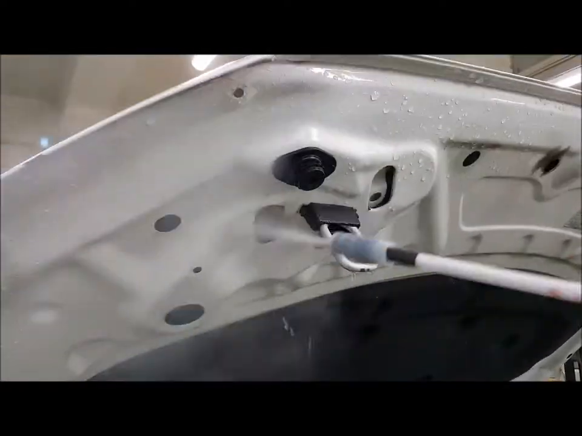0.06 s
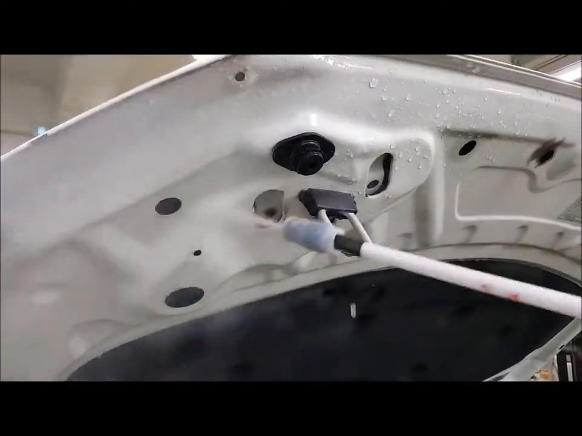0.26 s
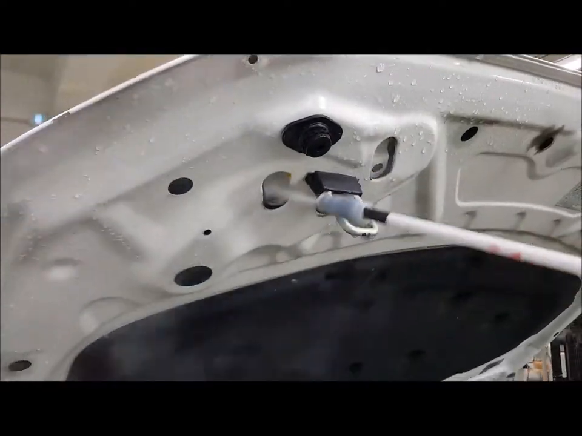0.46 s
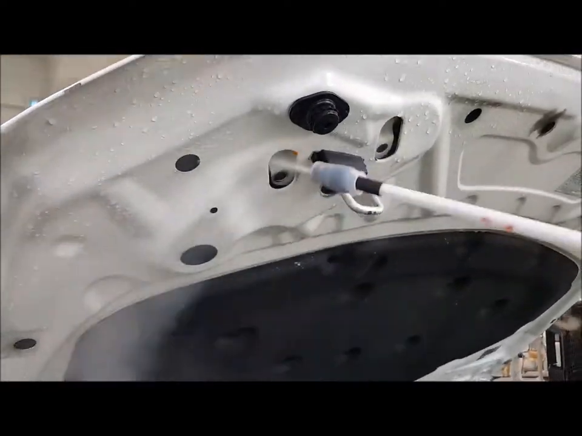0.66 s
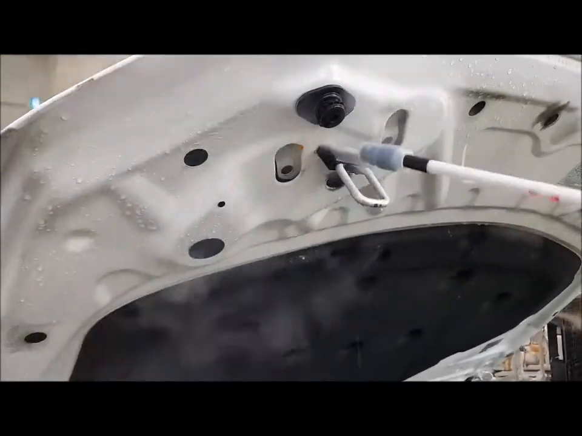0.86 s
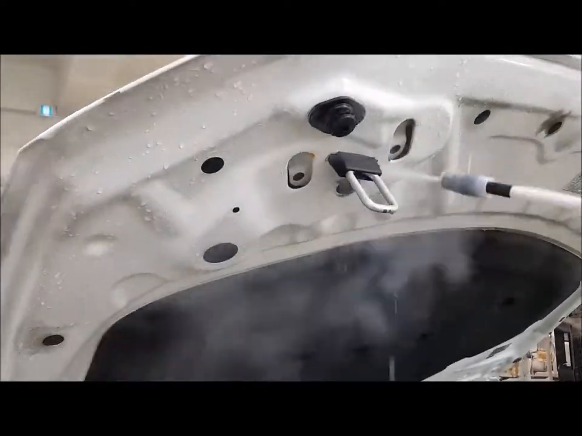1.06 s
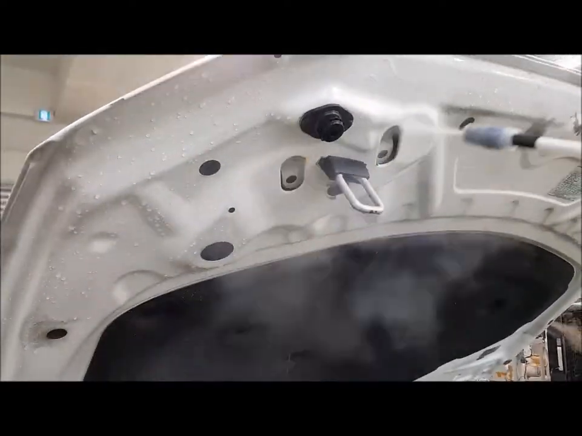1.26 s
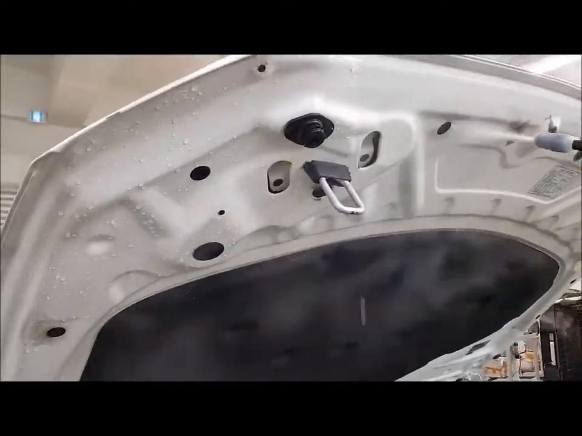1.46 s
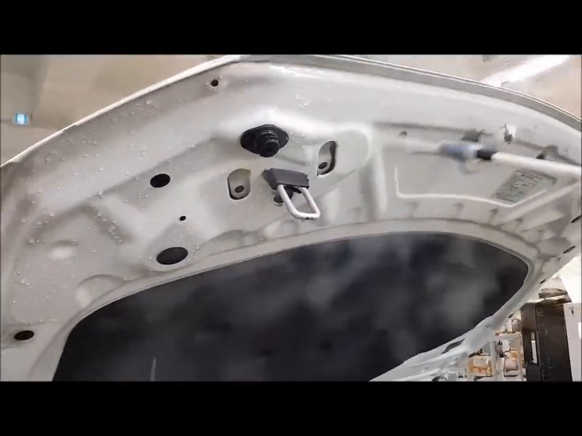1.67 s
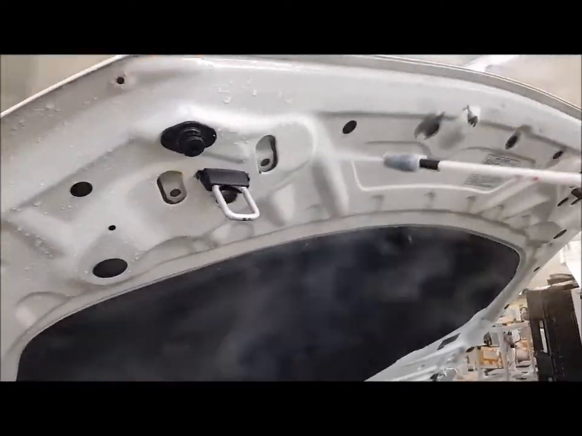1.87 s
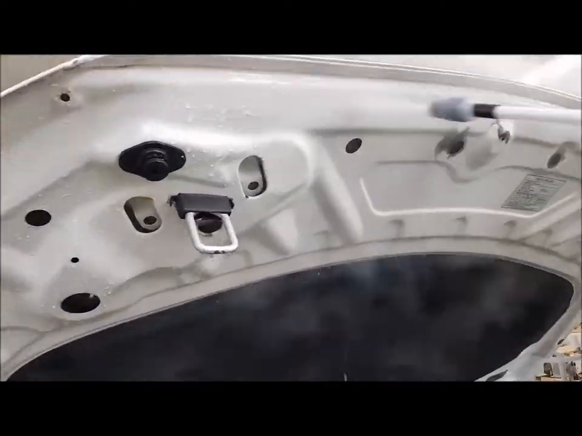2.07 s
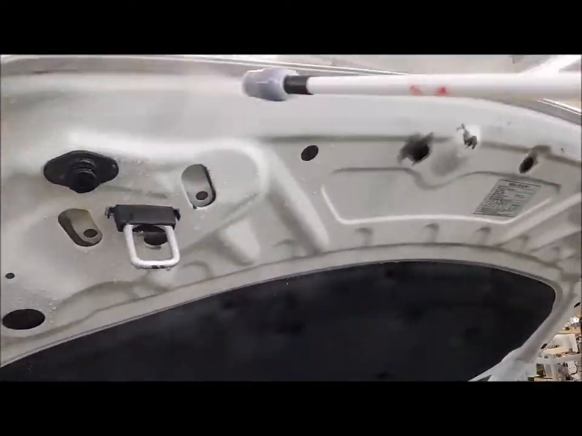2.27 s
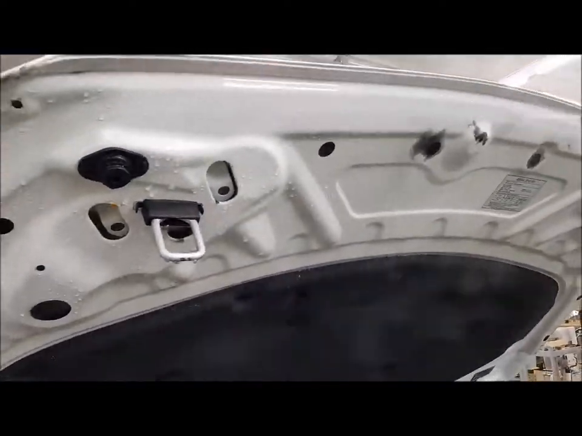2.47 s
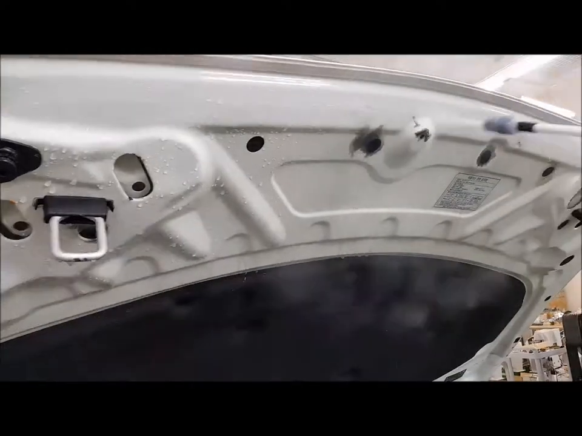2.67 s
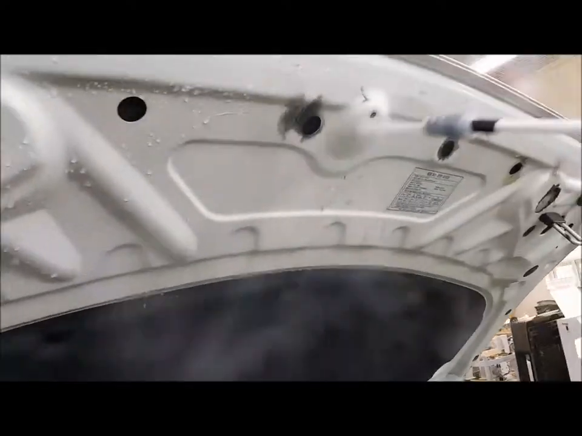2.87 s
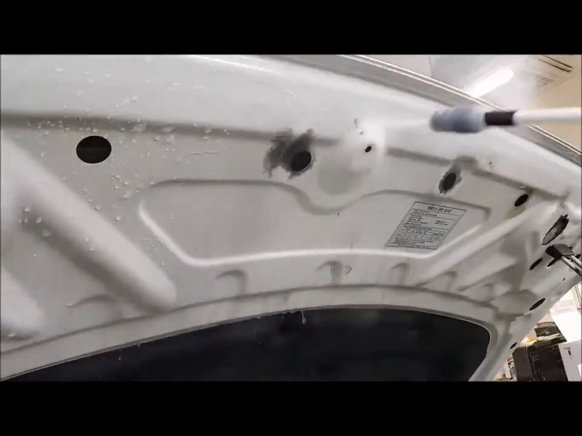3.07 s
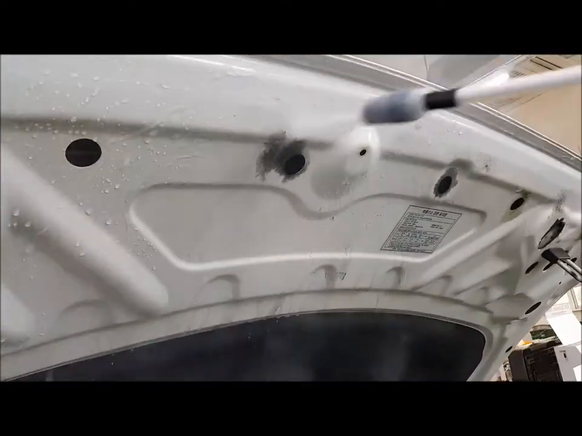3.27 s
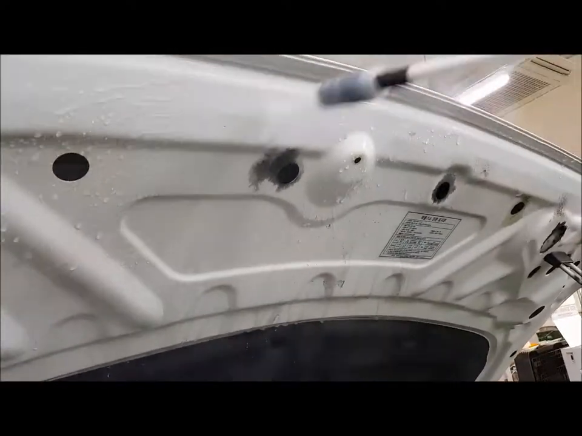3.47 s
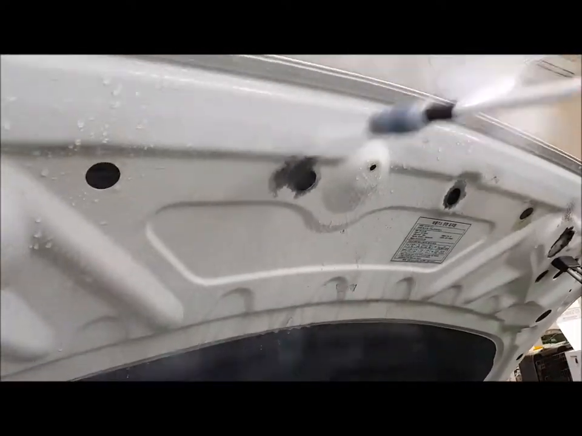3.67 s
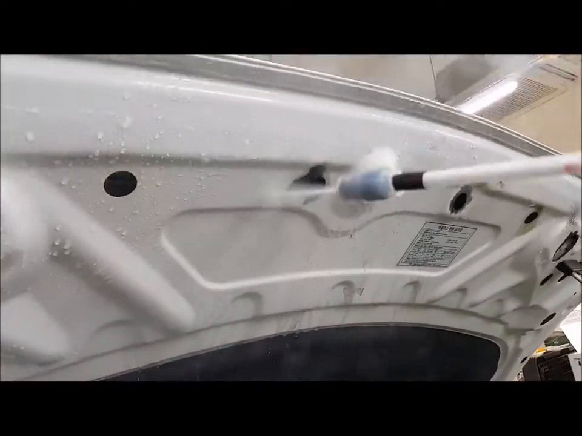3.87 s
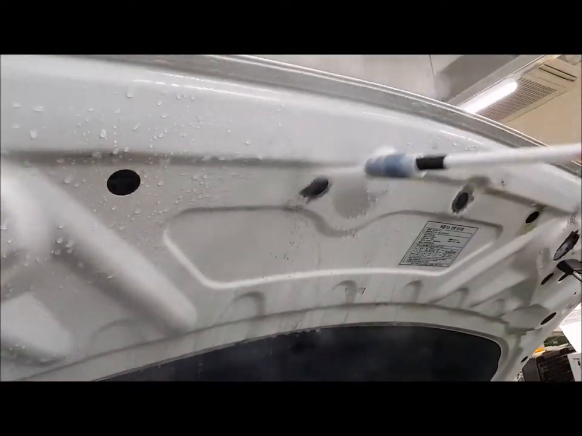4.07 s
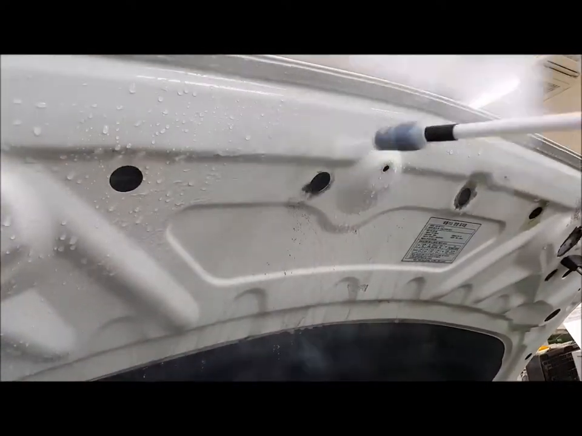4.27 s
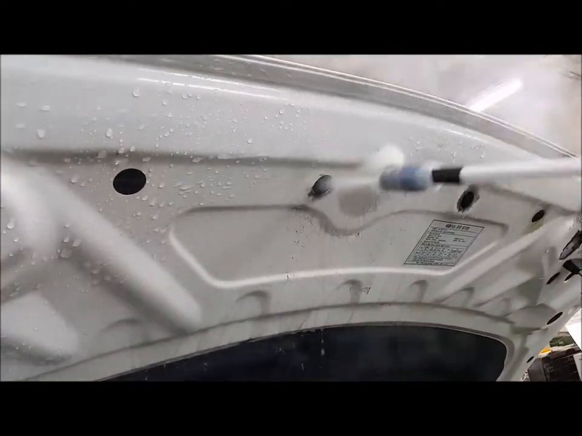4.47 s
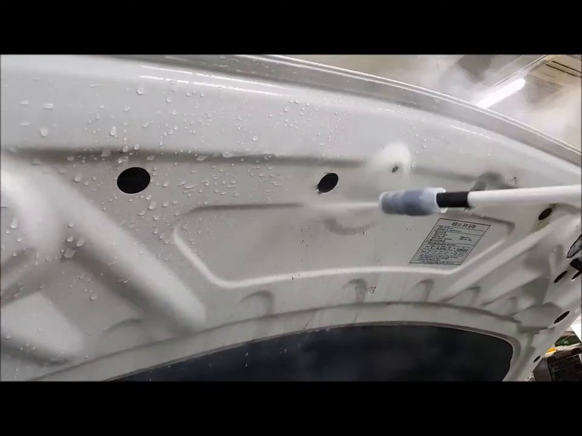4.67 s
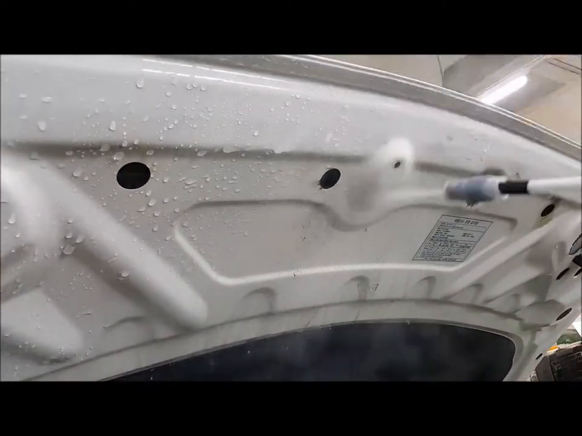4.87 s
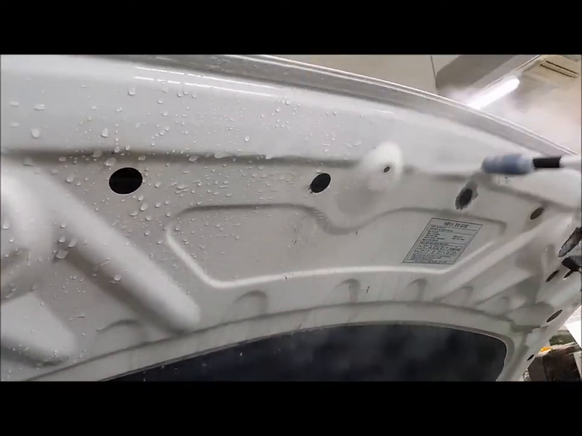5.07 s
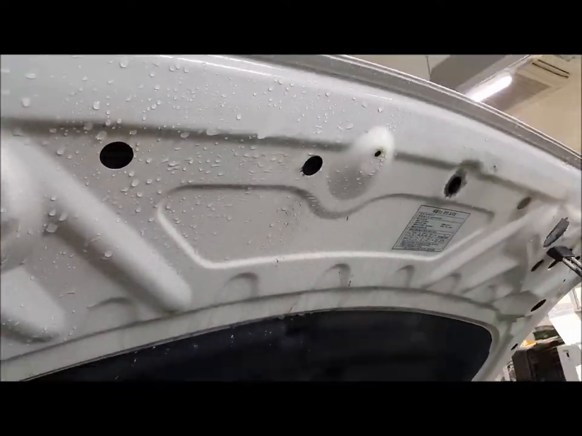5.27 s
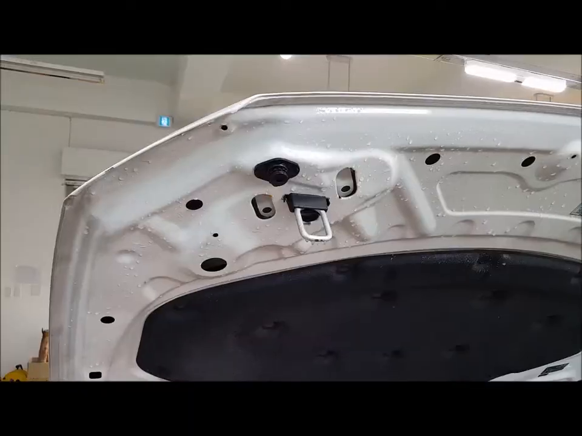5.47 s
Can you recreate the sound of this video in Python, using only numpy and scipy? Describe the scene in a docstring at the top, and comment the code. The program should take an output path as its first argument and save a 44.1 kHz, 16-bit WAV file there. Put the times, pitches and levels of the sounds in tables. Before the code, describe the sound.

A steam cleaner lance sprays the underside of a car bonnet close to the microphone, in a workshop with faint reverberation. From the start there is a loud, bright hiss with a softer roar on the sheet metal, and a sharp spurt of water at about 0.1 seconds. Hot water keeps spitting from the nozzle in fits of quick, evenly spaced bursts, some snapping, some splashy. A few faint, dull drips tick at around 0.8 seconds. The sputter is crisp and fast from 1.5 to 2.1 seconds, eases briefly, returns at 2.7, and comes in doubled bursts from about 3.9 to 4.7. The hiss shifts in colour as the jet sweeps over ribs and hollows. It thins at 5 seconds and dies away just after 5.2, leaving a quiet machine whine and rush of air. At about 5.5 seconds a low hum with rumble starts abruptly.

```python
"""Steam lance under a car bonnet

A steam jet is swept along the underside of a raised bonnet in a workshop, close to the microphone.
Its turbulence hisses and roars on the sheet metal; in fits, slugs of hot water plug the nozzle and burst
out at a steady beat, singly or in pairs. The panel resonates and reflects the hiss, and runoff drips.
When the trigger is let go the jet dies away and a machine's whine remains; at the very end the scene
cuts abruptly to a 220 Hz hum with rumble."""
import sys
import numpy as np
from scipy import signal
from scipy.fft import rfft, irfft
from scipy.io import wavfile
from scipy.ndimage import uniform_filter1d, map_coordinates

SR = 44100
rng = np.random.default_rng(int(sys.argv[2]) if len(sys.argv) > 2 else 0)


def put_to_file(sound):
    """Save the sound as 16-bit audio at rate SR, in the file named by the first command-line argument."""
    columns = np.atleast_2d(sound).T  # one column per channel
    safe = np.clip(columns, -1, 1)
    whole_steps = np.round(safe * 32767)
    wavfile.write(sys.argv[1], SR, whole_steps.astype(np.int16))


N = 242991
TIME = np.arange(N) / SR
FREQ = np.maximum(np.arange(N // 2 + 1) * SR / N, 1)

# the steady jet: (time [s], relative hiss level [dB], hiss tilt [dB/octave], relative roar level [dB])
JET_COURSE = [(0, -24.5, 0.2, -34), (.33, -24.5, 2, -33), (.55, -22.5, 2, -31.5), (.73, -25, 3, -32.5),
              (1.0, -23.5, 3.5, -33), (1.2, -24, 1.5, -34), (1.39, -22, 3.5, -33),
              (1.44, -27.5, 2.7, -34.5), (1.72, -21, .3, -34), (1.92, -27.5, 2, -36), (2.0, -23, 2.5, -32),
              (2.18, -26.5, 0.8, -33), (2.38, -23, 1, -38), (2.53, -28.5, 3, -33.5), (3.0, -24.5, 2, -33.5),
              (3.65, -28.5, 5.5, -32), (3.98, -24.5, 2.8, -29.5), (4.4, -27, 4, -30.5),
              (4.87, -26.5, 2.5, -33.5), (5.0, -29.5, 6.5, -37.5), (5.23, -29.5, 7, -36)]
# spectra of nozzle hiss, roar on the panel and spray: (frequency [Hz], relative density [dB])
HISS_SPECTRUM = [(1200, -32), (2300, -15), (2750, -2.5), (3100, -1), (4100, 3), (4600, 0.5), (5700, 1),
                 (7500, 2.5), (10000, 1), (12200, -5), (14000, -4), (15500, -3)]
ROAR_SPECTRUM = [(50, -58), (110, -41), (200, -24), (450, -12.5), (800, -6), (1150, -4), (1400, 4),
                 (2300, 0), (2800, -4.5), (4000, -12.5), (8000, -42)]
SPRAY_SPECTRUM = [(150, -51), (500, -31), (1000, -15.5), (1500, -5), (2300, -5.5), (2750, -3.5),
                  (3150, -1.5), (4100, 5), (4600, 0.5), (5600, -1), (7200, 1), (10000, -2), (12200, -10),
                  (15500, -15.5)]
# fits of sputtering: (first beat [s], last beat [s], beats [count], slugs per beat [count],
# first relative level [dB], last relative level [dB], slug length [ms], tilt [dB/octave])
SPUTTER_FITS = [(.097, .097, 1, 1, -17, -17, 24, -1), (.143, .321, 4, 1, -22.5, -23.5, 22, -0.5),
                (.369, .369, 1, 1, -20, -20, 26, -.5), (.433, .499, 2, 1, -24.5, -25, 20, 1.5),
                (.690, .866, 4, 1, -25.5, -27.5, 28, 7.5), (.930, 1.049, 3, 1, -26, -23, 23, 3.5),
                (1.116, 1.116, 1, 1, -19, -20, 17, 0), (1.184, 1.184, 1, 1, -20, -20.5, 14, 6.5),
                (1.236, 1.284, 2, 1, -23.5, -25.5, 28, 2.5), (1.331, 1.397, 3, 1, -24.5, -25.5, 9.4, 8.5),
                (1.536, 1.606, 2, 1, -18.5, -19, 13, 4), (1.651, 1.882, 8, 1, -16.5, -20, 8.5, 4.4),
                (1.975, 2.059, 4, 1, -18, -22, 9, 4), (2.118, 2.118, 1, 1, -15, -15, 7.5, 3.5),
                (2.414, 2.486, 2, 1, -33, -32.5, 27, -8.7), (2.668, 2.855, 4, 1, -16.5, -20.5, 22, -0.1),
                (2.904, 3.024, 3, 2, -17, -23.5, 11, 3.5), (3.105, 3.105, 1, 1, -21, -20.5, 7.8, 6.5),
                (3.147, 3.314, 4, 1, -19.3, -20, 24, -1.3), (3.372, 3.497, 3, 1, -28, -30, 27, -5.5),
                (3.767, 3.874, 3, 1, -24, -30, 14, -2), (3.929, 4.111, 4, 2, -22.5, -18, 14.2, 1.5),
                (4.172, 4.353, 4, 2, -19, -23, 14, 2.5), (4.418, 4.726, 6, 2, -19.3, -18, 14.5, 4.2),
                (4.784, 4.915, 3, 1, -20.5, -24, 12, 4)]
# modes of the bonnet's hollow ribs: (frequency [Hz], bandwidth [Hz], relative lift [dB])
RIB_MODES = [(1490, 210, 2.5), (1923, 210, 4.5), (2400, 240, 5.5), (3240, 350, 2.5), (4070, 350, 1),
             (5010, 310, 2.5), (5535, 390, 3.5), (9000, 1000, -1.5)]
# cavities under the jet (holes, latch, slot, groove, corner rib, front edge):
# (arrival [s], departure [s], modes as (frequency [Hz], bandwidth [Hz], lift or cut [dB]))
CAVITIES = [(0, 1.074, [(3300, 900, 2.5), (5540, 400, 4.5), (7100, 520, 2.5), (8800, 460, 3),
            (11180, 260, 4)]), (1.028, 1.444, [(2440, 400, 2.5), (6070, 280, 4.5), (9130, 450, 6),
            (14200, 600, 4.5)]), (1.53, 2.176, [(2050, 280, 3), (2585, 170, 10.5), (5250, 760, -6),
            (10600, 250, 3)]), (2.39, 2.72, [(1400, 200, 3), (2550, 250, 4), (3150, 500, -3)]),
            (2.72, 4.88, [(1590, 170, 1.5), (2770, 250, -6.5), (3060, 200, 3.5), (3950, 220, 2),
            (5150, 300, 1.5), (15350, 300, 2)]), (3.3, 3.9, [(4500, 420, -1.5), (9950, 350, 2),
            (11100, 300, 5), (11900, 500, -4)])]
# the landing spot: (time [s], skin echo lag [ms], left minus right treble [dB], scattered part [dB])
LANDING_SPOT = [(0, 0.96, 3.2, -7.5), (.85, .76, 0.4, -3.5), (1.2, 0.67, -1.5, -18),
                (1.6, 0.898, -1.5, -14), (2.55, 0.85, 0, -13), (2.79, 0.83, 2, -11), (2.9, 0.87, -2, -19),
                (3.55, 1.08, 0.5, -5), (3.9, 1.02, -0.5, -11), (5.2, 0.93, -2, -8.5)]
# drops falling on metal: (time [s], peak level [dB])
DROPS = [(0.755, -28), (.7655, -24.5), (.828, -25), (0.833, -37)]
# the background as heard, coming up as the steam fades:
# (time [s], rush level [dB], whine level [dB], rumble level [dB])
BACKGROUND_COURSE = [(0, -46.5, -60, -90), (1.0, -55, -69, -93), (1.4, -52, -54, -76),
                     (3.5, -45.5, -58, -77), (4.8, -47.5, -57, -78), (5.05, -38, -50, -76),
                     (5.44, -40, -40.5, -64)]
# partials of the whine: (frequency [Hz], level relative to the whine [dB])
WHINE_PARTIALS = [(480, -10.5), (959, -3), (1200, -11.5), (1441, -5.5)]
# spectra of the rush and rumble: (frequency [Hz], relative density [dB])
RUSH_SPECTRUM = [(40, -48), (100, -22), (150, -18), (235, -8), (330, -8.5), (480, 2), (700, -1), (1050, 3),
                 (1700, -7.5), (5000, -9.5), (10000, -9), (15500, -23)]
RUMBLE_SPECTRUM = [(25, 0), (120, -2), (300, -27), (1000, -60)]
# the two microphone ports: (frequency [Hz], coherence [0-1], left phase lead [rad], left minus right [dB])
MIC_PORTS = [(60, 0.74, 0.5, -2), (298, 0.76, 0.51, 0.5), (700, 0.7, .15, 0.5), (1460, 0.91, .1, 0),
             (3230, 0.93, .15, -.5), (4850, 0.82, 0.91, -.5), (6300, 0.45, 0.7, 0), (8030, 0.66, 1.84, 0),
             (10600, 0.73, 0.82, -1.5), (12000, 0.46, 2, -1.5), (13000, 0, 4.8, -3.5),
             (15800, 0.74, 1.5, -2.5)]


def jet():
    """Turbulent mixing noise: steam hisses at the nozzle and roars where it lands; the wet flow flutters."""
    hiss_db, tilt_db, roar_db = curves(JET_COURSE)
    hiss = turbulence(HISS_SPECTRUM, rib_lift(depth=0.54))
    hiss = brighten(hiss, tilt_db, pivot_hz=4880, flicker_db=1.0) * undb(hiss_db + 2.5)
    roar = turbulence(ROAR_SPECTRUM, rib_lift(depth=0.63)) * undb(roar_db + walk(45))
    flutter = undb(0.97 * walk(75) + 0.85 * walk(910))
    return (hiss + roar) * flow() * flutter


def flow(release_s=5.243, shut_s=0.013, bleed_s=0.064, trapped_db=-12, plug_share=0.23):
    """Throttling: each slug chokes the jet; on release the valve shuts and trapped steam bleeds away."""
    since = np.maximum(TIME - release_s, 0)
    trapped = undb(trapped_db)
    share = (1 - trapped) * np.exp(-since / shut_s) + trapped * np.exp(-since / bleed_s)
    for burst_s, length_s, _, _ in slugs():
        near = around(burst_s)
        age = (TIME[near] - burst_s) / length_s
        share[near] *= 1 - plug_share * np.exp(-.5 * ((age + 1.34) / 0.3) ** 2)  # just before the burst
    return share


def sputter(rise=0.45, fall=0.49, snap_s=.016, grit_db=1.75, body_per_s=7):
    """Atomisation: slugs burst into gritty spray; short ones snap, long ones splash with a hollow body."""
    power, tilt_sum, body_sum = np.full(N, 1e-12), np.zeros(N), np.zeros(N)
    for burst_s, length_s, level_db, tilt_db in slugs():
        near = around(burst_s)
        age = (TIME[near] - burst_s) / length_s  # in slug lengths, as are rise and fall
        steepness = 2 + (snap_s / length_s) ** 2
        falloff = np.where(age < 0, abs(age / rise) ** steepness, abs(age / fall) ** 2.3)
        size = undb(level_db + 0.5 * rng.standard_normal())
        burst = size ** 2 * np.exp(-.5 * falloff)
        power[near] += burst
        tilt_sum[near] += burst * tilt_db  # overlapping slugs are weighted by their power
        body_sum[near] += burst * body_per_s * length_s
    spray = turbulence(SPRAY_SPECTRUM, rib_lift(depth=1.21))
    spray = brighten(spray, tilt_sum / power, pivot_hz=4630, flicker_db=1.96)
    body = body_sum / power * resonance(spray, hz=3600, width_hz=1900)
    grit = undb(1.0 + grit_db * walk(690) + 1.03 * walk(120))
    return (spray + body) * np.sqrt(power) * grit


def slugs(swell_db=1.2, pair_gap_s=0.024):
    """Slug flow beats evenly in each fit: yields (time [s], length [s], level [dB], tilt [dB/octave])."""
    for first_s, last_s, beats, per_beat, first_db, last_db, length_ms, tilt_db in SPUTTER_FITS:
        for along in np.linspace(0, 1, round(beats)):
            beat_s = first_s + along * (last_s - first_s)
            level_db = first_db + along * (last_db - first_db) + swell_db * np.sin(np.pi * along)
            for k in range(round(per_beat)):
                yield beat_s + k * pair_gap_s, length_ms / 1000, level_db, tilt_db


def rib_lift(depth):
    """Modal response: the hollow ribs colour sound on the panel with Lorentzian curves, summed in dB."""
    return depth * sum(db / (1 + (2 * (FREQ - hz) / width) ** 2) for hz, width, db in RIB_MODES)


def cavities(x, glide_s=0.049):
    """Cavity resonance: each hollow rings or absorbs at its modes while the jet plays on it."""
    out = x
    for arrival_s, departure_s, modes in CAVITIES:
        on_cavity = (TIME >= arrival_s) & (TIME < departure_s)
        coupling = uniform_filter1d(on_cavity * 1., int(glide_s * SR))
        out = out + coupling * sum((undb(db) - 1) * resonance(x, hz, width) for hz, width, db in modes)
    return out


def panel_echoes(x, rib_ms=0.342, rib_gain=0.08, skin_gain=0.12):
    """Comb filtering: echoes off rib and bonnet skin interfere; the peaks slide as the lance moves."""
    skin_ms = curves(LANDING_SPOT)[0]
    echoes = [rib_gain * delayed(port, rib_ms) + skin_gain * delayed(port, skin_ms) for port in x]
    return (x + np.array(echoes)) / np.sqrt(1 + rib_gain ** 2 + skin_gain ** 2)


def sweep(x, shade_hz=7000, lead_ms_per_db=0.0161):
    """Time and level cues: as the landing spot moves, one port hears it earlier and brighter."""
    pan_db = curves(LANDING_SPOT)[1]
    x = np.array([x[0], delayed(x[1], lead_ms_per_db * pan_db)])
    treble = irfft(rfft(x) / (1 + (shade_hz / FREQ) ** 4), N)
    return x + treble * (undb(np.array([pan_db, -pan_db]) / 2) - 1)


def engine_bay(x, t60_s=0.022, turns_per_s=0.797):
    """Multipath scattering: short paths trade places as the lance sweeps, so their colour swirls."""
    share = undb(curves(LANDING_SPOT)[2])
    turn = 2 * np.pi * turns_per_s * TIME
    scattered = np.cos(turn) * diffuse(x, t60_s) + np.sin(turn) * diffuse(x, t60_s)
    return (x + share * scattered) / np.sqrt(1 + share ** 2)


def radiated(x, corner_hz=130):
    """Radiation efficiency: a source much smaller than the wavelength gives almost no bass."""
    return signal.sosfilt(signal.butter(3, corner_hz, "high", fs=SR, output="sos"), x)


def drips(ring_hz=950, width_hz=800):
    """Damped impulse response: runoff lands on metal in short, dead ticks."""
    impacts = np.full(N, 1e-18)
    for time_s, peak_db in DROPS:
        impacts[int(time_s * SR)] += undb(peak_db)
    ticks = resonance(resonance(impacts, ring_hz, width_hz), ring_hz, width_hz)
    return ticks * impacts.max() / abs(ticks).max()


def background(waver_db=2.0, cut_s=5.452, cut_rise_s=0.0028, hum_hz=220.5, hum_db=-34.5):
    """Tonal and broadband noise: whine, rush and rumble; at the end the scene cuts to a rumbling hum."""
    rush_db, whine_db, rumble_db = curves(BACKGROUND_COURSE)
    whine = sum(undb(db + waver_db * walk(7.3)) * np.sin(2 * np.pi * hz * TIME + 0.55 * walk(15))
                for hz, db in WHINE_PARTIALS)
    after_cut = np.clip((TIME - cut_s) / cut_rise_s, 0, 1)
    hum = undb(hum_db) * after_cut * np.sin(2 * np.pi * hum_hz * TIME)
    rumble_gain = undb(rumble_db + 4.5 * walk(8)) + undb(-63) * after_cut
    noise = turbulence(RUSH_SPECTRUM) * undb(rush_db) + turbulence(RUMBLE_SPECTRUM) * rumble_gain
    return noise + np.sqrt(2) * (whine * undb(whine_db) + hum)


def room(x, t60_s=0.62, wet_db=-16, damping_hz=7000):
    """Reverberation: the workshop's walls return a faint tail that has lost its top."""
    tail = irfft(rfft(diffuse(x, t60_s)) / np.sqrt(1 + (FREQ / damping_hz) ** 2), N)
    return x + undb(wet_db) * tail


def turbulence(spectrum, lift_db=0):
    """Partial coherence: coloured noise from an extended source reaches the two ports only partly alike."""
    coherence, lead_rad, balance_db = spectra(MIC_PORTS)
    shared, left, right = rfft(rng.standard_normal((3, N)))
    pair = np.sqrt(coherence) * shared + np.sqrt(1 - coherence) * np.array([left, right])
    pair = pair * np.array([undb(balance_db / 2) * np.exp(1j * lead_rad), undb(-balance_db / 2)])
    return unit_rms(irfft(pair * undb(spectra(spectrum)[0] + lift_db), N))


def brighten(x, tilt_db, pivot_hz, flicker_db, top_octaves=1.5):
    """Spectral tilt: a moving slope per octave levels off in the top treble; each octave also flickers."""
    octave = np.clip(np.log2(FREQ / pivot_hz), -2, 2)
    spectrum, out = rfft(x), 0
    for k in range(-2, 3):
        band = irfft(spectrum * np.maximum(1 - abs(octave - k), 0), N)
        out = out + band * undb(min(k, top_octaves) * tilt_db + flicker_db * walk(46))
    return out


def diffuse(x, t60_s):
    """Diffuse field: dense reflections decay exponentially, independently at each port."""
    age = TIME[:SR // 2]
    tail = rng.standard_normal((2, len(age))) * undb(-60 * age / t60_s) * (age > .002)
    tail = tail / np.sqrt(np.sum(tail ** 2, axis=1, keepdims=True))
    return signal.fftconvolve(x, tail, axes=1)[:, :N]


def resonance(x, hz, width_hz):
    """Second-order resonator with gain 1 at its centre."""
    return signal.lfilter(*signal.iirpeak(hz, hz / width_hz, fs=SR), x)


def delayed(x, lag_ms):
    """Propagation delay, steady or moving."""
    return map_coordinates(x, [np.arange(N) - lag_ms * SR / 1000], order=3)


def walk(rate):
    """Smooth random modulation of rms 1 that changes about rate times a second."""
    hold = max(int(SR / (2 * rate)), 1)
    steps = np.repeat(rng.standard_normal(N // hold + 1), hold)[:N]
    return unit_rms(uniform_filter1d(uniform_filter1d(steps, hold), hold // 2 + 1))


def curves(table):
    """Linear interpolation of each column over time."""
    times, *columns = np.transpose(table)
    return [np.interp(TIME, times, column) for column in columns]


def spectra(table):
    """Interpolation of each column over log frequency."""
    hz, *columns = np.transpose(table)
    return [np.interp(np.log(FREQ), np.log(hz), column) for column in columns]


def around(time_s):
    """The samples within 0.1 s of a moment."""
    return slice(max(int((time_s - .1) * SR), 0), int((time_s + .1) * SR))


def undb(db):
    """Decibels to amplitude ratio."""
    return 10 ** (np.asarray(db) / 20)


def unit_rms(x):
    """Normalisation to rms 1."""
    return x / np.sqrt(np.mean(x ** 2))


def scene():
    """Superposition: jet and sputter under the bonnet, with drips, room and background."""
    on_panel = panel_echoes(cavities(jet() + sputter()))
    steam = engine_bay(sweep(on_panel)) * undb(-.5)
    return room(radiated(steam + drips())) + background()


def record(dry, ceiling=.9, top_hz=15750):
    """Soft saturation rounds the highest peaks, and a steep low-pass limits the bandwidth."""
    rounded = dry / (1 + (dry / ceiling) ** 6) ** (1 / 6)
    return signal.sosfilt(signal.ellip(12, .1, 80, top_hz, fs=SR, output="sos"), rounded)


dry = scene()
out = record(dry)
put_to_file(out)
```